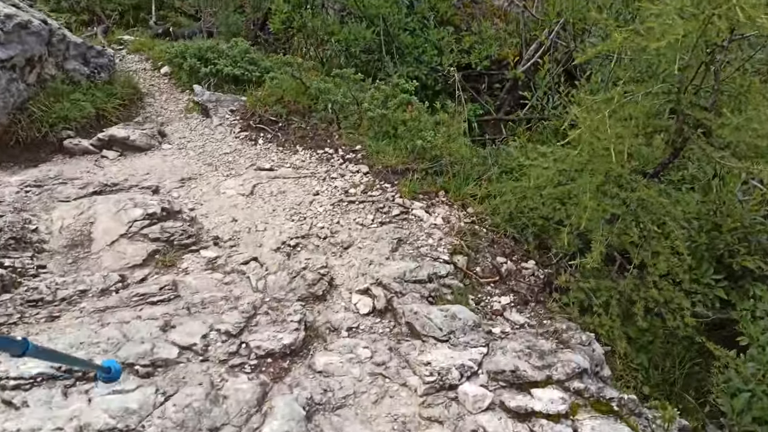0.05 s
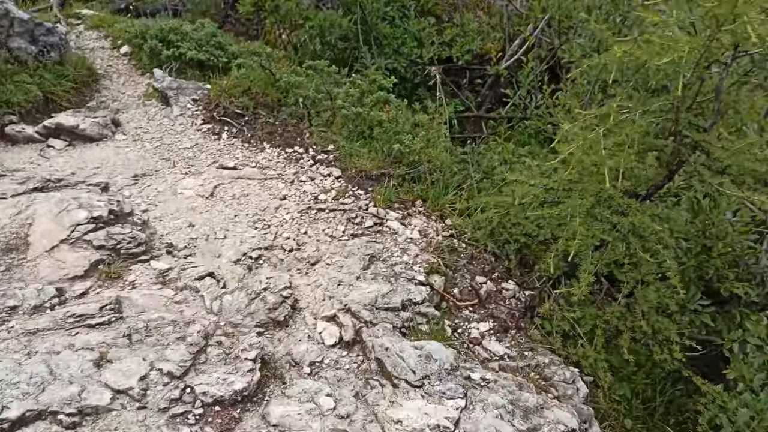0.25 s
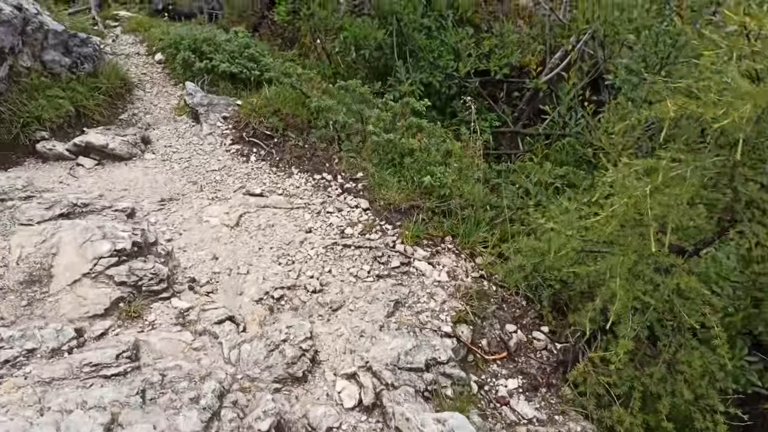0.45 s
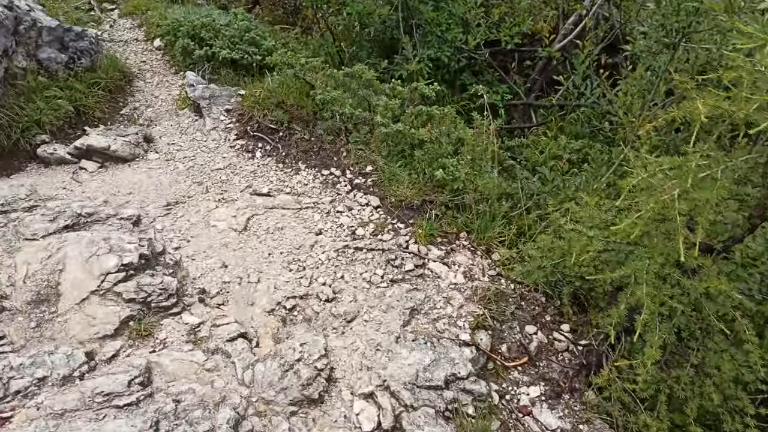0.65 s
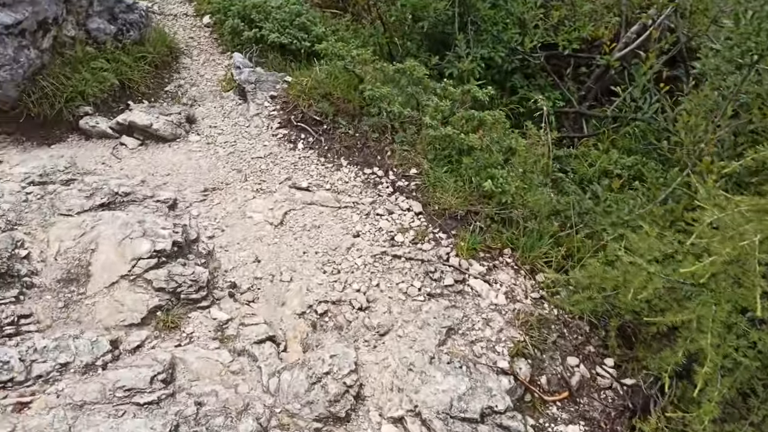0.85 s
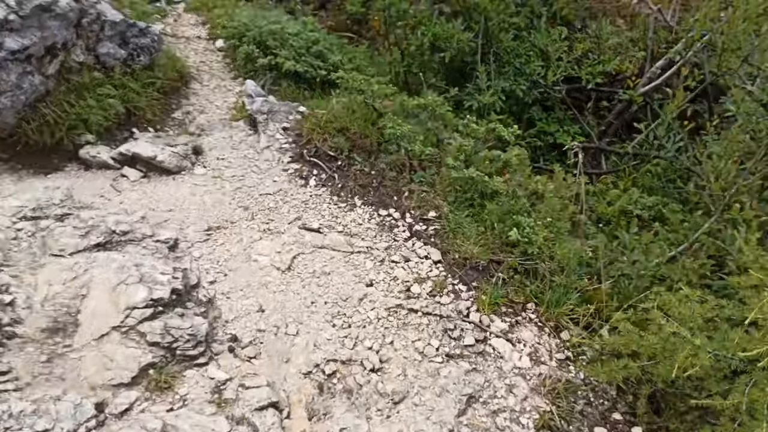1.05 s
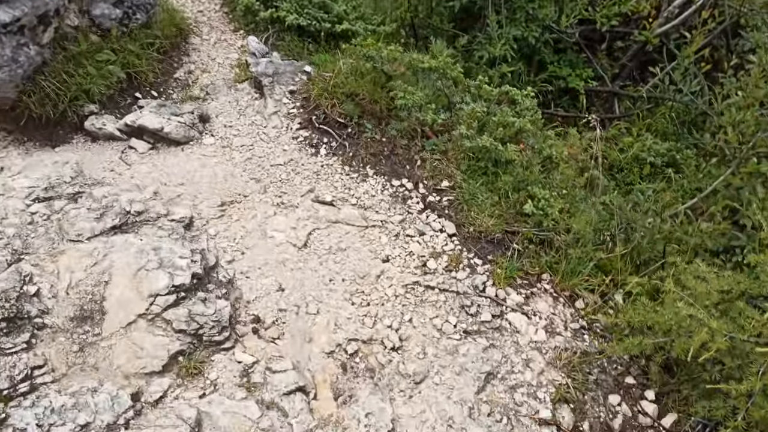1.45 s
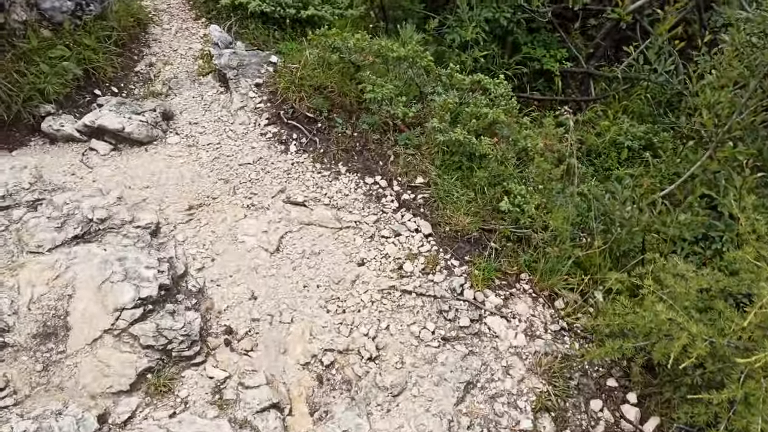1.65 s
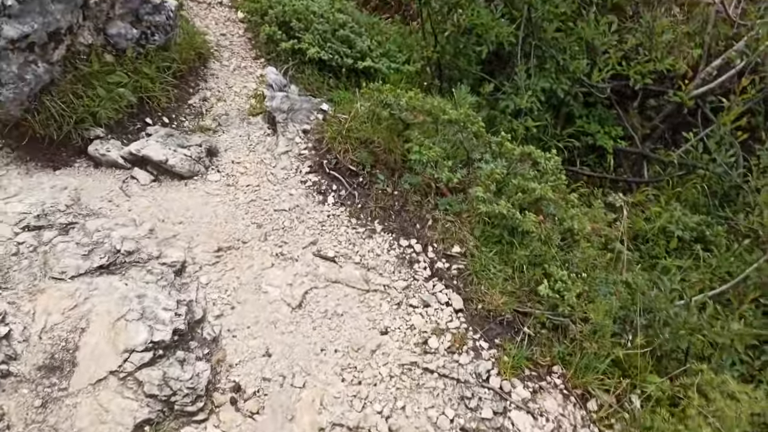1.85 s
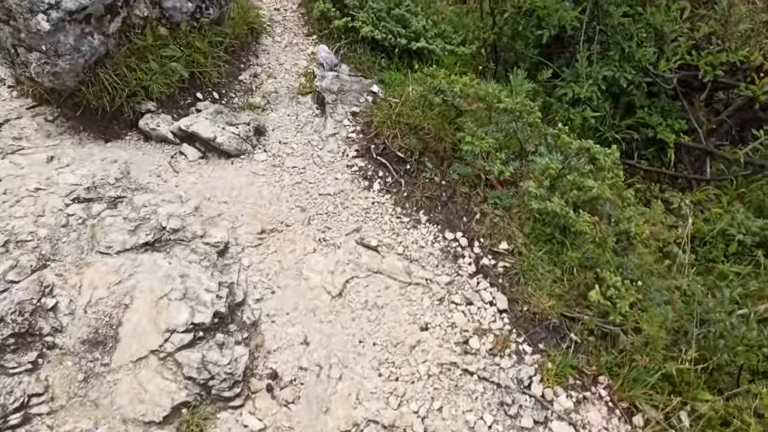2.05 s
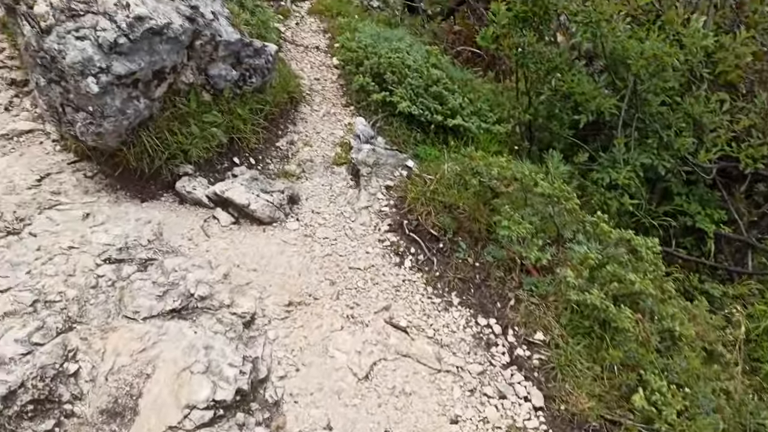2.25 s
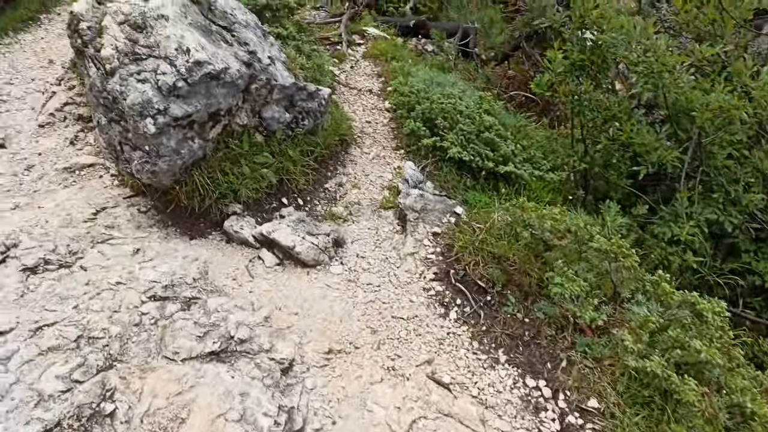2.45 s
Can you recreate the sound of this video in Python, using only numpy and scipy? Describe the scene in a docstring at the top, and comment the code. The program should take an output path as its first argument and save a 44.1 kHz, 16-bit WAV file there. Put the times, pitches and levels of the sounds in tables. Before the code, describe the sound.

A hiker's boots scuff gravel with dull thuds, close by, over faint outdoor hiss. Around 0.3 seconds a metal pole tip cracks twice on rock, chattering and ringing briefly. Uneven steps continue, with small stones ticking and grinding, most clearly near 1.1 seconds. A distant bird gives thin, faint whistles at 0.5 and 1.5 seconds. At about 2.3 seconds the pole strikes twice more, the second time softer.

```python
"""A hiker on a stony mountain trail, heard from a microphone carried at the body.
Over a faint outdoor hiss, boots scuff the gravel and land with dull thuds. A metal pole tip cracks on rock
twice, chattering and ringing the shaft. Small stones tick and grind under the soles as the walk goes on,
and a far bird whistles twice, a second apart. Near the end the pole strikes twice more."""
import sys
import numpy as np
from scipy import signal
from scipy.fft import rfft, irfft, next_fast_len
from scipy.io import wavfile
from scipy.ndimage import uniform_filter1d

SR = 44100
rng = np.random.default_rng(int(sys.argv[2]) if len(sys.argv) > 2 else 0)


def transcribe(signal):
    """Save signal, clipped to [-1, 1], as a 16-bit WAV file at the path in sys.argv[1]."""
    frames = np.atleast_2d(signal).T
    limited = np.clip(frames, -1, 1)
    pcm = np.round(limited * 32767).astype(np.int16)
    wavfile.write(sys.argv[1], SR, pcm)


N = 114660
T = np.arange(N) / SR
HIT_T = T[:8192]  # time axis of one short sound
TIP_LIKENESS, GRIT_LIKENESS = 0.53, 0.3  # left-right correlation: 0 is wide, 1 is mono


def undb(db):
    return 10 ** (np.asarray(db) / 20)


def unit(x):
    """Scale to rms 1."""
    return x / np.sqrt(np.mean(x ** 2))


def blow(x):
    """Scale a hit to the energy of 10 ms at rms 1."""
    return unit(x) * np.sqrt(.01 * SR / x.shape[-1])


def pan(db):
    """Left and right gains; positive dB leans left."""
    return unit(undb(np.array([[db], [-db]]) / 2))


def add(out, start_s, x):
    """Mix a short sound in."""
    i = int(start_s * SR)
    out[:, i:i + x.shape[-1]] += x[..., :N - i]


def colour(x, points):
    """Minimum-phase EQ through (Hz, dB) points."""
    size = 2 * next_fast_len(x.shape[-1])
    hz, db = np.array(points, float).T
    gain = undb(np.interp(np.log(np.fft.rfftfreq(size, 1 / SR) + 1), np.log(hz), db))
    cepstrum = irfft(np.log(gain))
    cepstrum[1:size // 2] *= 2
    cepstrum[size // 2 + 1:] = 0
    return irfft(rfft(x, size) * np.exp(rfft(cepstrum)))[..., :x.shape[-1]]


def band(x, hz, width_hz):
    """One resonance."""
    return signal.lfilter(*signal.iirpeak(hz, hz / width_hz, fs=SR), x)


def steep_band(x, hz, width_hz):
    """The same resonance twice, for steeper skirts."""
    return band(band(x, hz, width_hz), hz, width_hz)


def stereo(three, likeness):
    """Left and right from one shared and two separate signals."""
    return np.sqrt(likeness) * three[0] + np.sqrt(1 - likeness) * three[1:]


def swell(rise_s):
    """Rounded attack."""
    return np.sin(np.pi / 2 * np.minimum(HIT_T / rise_s, 1)) ** 2


def arch(length_s):
    """Round-shouldered envelope from silence to silence."""
    return np.sqrt(np.abs(np.sin(np.pi * np.minimum(HIT_T / length_s, 1))))


def burst(rise_s, fade_s, likeness=TIP_LIKENESS):
    """Dense micro-impacts that build up and die away."""
    noise = stereo(rng.standard_normal((3, len(HIT_T))), likeness)
    return noise * swell(rise_s) * np.exp(-np.maximum(HIT_T - rise_s, 0) / fade_s)


def air(level_db=-60.5, waver_db=.8, wide_above_hz=1514):
    """A soft, wavering outdoor bed, centred in the bass and wide in the treble."""
    # tone of the outdoor hiss: freq_hz, gain_db
    air_eq = [(25, -30), (55, -8.5), (95, -5.5), (250, -2.5), (450, -5.5), (900, -9), (1600, -17.5),
              (3600, -18), (5500, -22.5), (7000, -14), (8500, -21), (12500, -24.5), (16000, -31.5)]
    mid, side, drift = rng.standard_normal((3, N))
    side = signal.sosfilt(signal.butter(1, wide_above_hz, "high", fs=SR, output="sos"), side)
    for _ in range(2):
        drift = uniform_filter1d(drift, size=4000, mode="wrap")
    hiss = unit(colour(mid + 1.3 * np.array([side, -side]), air_eq))
    return undb(level_db + waver_db * unit(drift)) * hiss


def grains(eq, grains_per_s=2500, spread_db=4.5):
    """A stream of grit clicks of unequal size."""
    size = undb(spread_db * np.minimum(rng.exponential(size=(3, N)), 4.3))
    hits = rng.random((3, N)) < grains_per_s / SR
    clicks = hits * size * np.sign(rng.standard_normal((3, N)))
    return unit(colour(stereo(clicks, GRIT_LIKENESS), eq))


def scuffs(rise_s=.011, fade_s=.022):
    """Each drag of a sole swells, holds and fades: fine grit hisses, coarse gravel crunches."""
    # soles dragging over grit: start_s, length_s, hiss_db, crunch_db, pan_db
    drags = [(-.02, 0.076, -57, -59.5, -1.5), (0.219, 0.034, -45, -71, 2.5),
             (0.27, 0.063, -48.5, -58.5, -0.5), (0.375, .025, -51, -45.5, -2),
             (0.484, 0.099, -60, -64.5, -3.5), (.53, 0.13, -57, -67, -0.5), (0.724, .02, -60.5, -61.5, -4),
             (0.906, 0.082, -57, -68, 2.5), (1.003, 0.047, -57.5, -58.5, -1.5),
             (1.065, 0.071, -46, -48.5, -3.5), (1.15, 0.033, -51, -54, 0.5),
             (1.203, 0.086, -50.5, -52, -7.5), (1.335, 0.088, -58, -62, -32),
             (1.422, 0.068, -55.5, -53, -6), (1.532, 0.17, -62.5, -63.5, -7), (1.618, 0.11, -55, -58, -3.5),
             (1.742, 0.19, -64, -62.5, -2.5), (1.943, 0.074, -59, -59.5, -6),
             (2.053, 0.023, -57.5, -54.5, 1.5), (2.273, 0.099, -48.5, -49, -2.5),
             (2.38, 0.22, -64, -61, -4)]
    # tone of fine grit: freq_hz, gain_db
    grit_eq = [(300, -16), (1200, -5), (2400, -7.5), (3500, -3), (4500, -1.5), (5500, -13.5), (6700, 4),
               (7700, -1.5), (8500, -8), (12000, -13), (16000, -16)]
    # tone of coarse gravel: freq_hz, gain_db
    gravel_eq = [(40, -40), (110, 2), (260, 0), (500, -5), (800, -4), (1200, -14.5), (2200, -13),
                 (6000, -48.5)]
    hiss_power, crunch_power = 0, 0
    for start_s, length_s, hiss_db, crunch_db, pan_db in drags:
        attack = np.clip((T - start_s) / rise_s, 0, 1)
        release = np.exp(-np.maximum(T - start_s - length_s, 0) / fade_s)
        envelope = pan(pan_db) * attack * release
        hiss_power += (undb(hiss_db) * envelope) ** 2
        crunch_power += (undb(crunch_db) * envelope) ** 2
    return np.sqrt(hiss_power) * grains(grit_eq) + np.sqrt(crunch_power) * grains(gravel_eq)


def thuds(low_cut_hz=116, high_cut_hz=1110, settle_db=-6.5):
    """Boots and gear push once into a heavily damped low resonance, then settle a little."""
    # dull knocks of boots and gear: start_s, level_db, pitch_hz, pan_db
    knocks = [(0.2232, -30.5, 302, -0.5), (.248, -41, 255, 1), (0.3986, -29.5, 208, -1.5),
              (0.41, -53, 262, 18), (.426, -48, 240, 1), (0.93, -53.5, 350, -3), (0.9698, -30, 260, 1),
              (0.9768, -34.5, 314, 0), (1.120, -42, 635, -31), (1.127, -46.5, 290, -17),
              (1.143, -48, 500, 1), (1.2108, -45, 446, -29), (1.6335, -40, 252, -0.5),
              (1.648, -40, 300, -1), (1.676, -50.5, 274, 0), (1.695, -39.5, 302, -1.5),
              (1.7021, -37, 240, -0.5), (1.753, -48.5, 228, 0), (1.834, -54, 330, -1),
              (1.873, -58.5, 500, 0), (2.0664, -38, 162.4, 1), (2.1405, -49, 310, -3.5),
              (2.198, -56.5, 545, 7.5), (2.3597, -43, 314, 2)]
    cuts = np.vstack([signal.butter(3, low_cut_hz, "high", fs=SR, output="sos"),
                      signal.butter(2, high_cut_hz, fs=SR, output="sos")])
    push = HIT_T * np.exp(-HIT_T / .00043)
    out = np.zeros((2, N))
    for start_s, level_db, hz, pan_db in knocks:
        settle = burst(rise_s=.001, fade_s=.01, likeness=.9)
        body, tail = (blow(signal.sosfilt(cuts, band(x, hz, width_hz=hz))) for x in (push, settle))
        add(out, start_s, undb(level_db) * pan(pan_db) * (body + undb(settle_db) * tail))
    return out


def pole(tail_db=-6.5, tail_s=.013):
    """The tip cracks and chatters on rock, the shaft rings, nearby rock scatters a short tail."""
    # tip on rock: start_s, crack_db, rise_s, fade_s, ring_db, pan_db, one band_db per tip resonance
    strikes = [(0.2578, -17.5, 0.0017, 0.0053, -27, 0, -37, -28.5, -29.5, -32, -13.5),
               (0.3498, -24, 0.0028, .0021, -28.5, 4, -40, -36, -36, -26, -16),
               (2.2941, -21, 0.0019, 0.0034, -27, 3, -28.5, -37.5, -25, -21.5, -20.5),
               (2.3456, -43.5, 0.0027, 0.0045, -30.5, 4.5, -36, -43, -42, -35.5, -31)]
    # tone of the crack: freq_hz, gain_db
    crack_eq = [(60, -20.5), (400, -4.5), (700, -8.5), (1100, -1), (1600, -4), (2300, -8.5), (3500, -1),
                (4700, -0.5), (5300, -19.5), (6000, 6), (6700, 0.5), (7600, 4.5), (8400, -0.5), (12000, -8),
                (16000, -18.5)]
    # five broad resonances of the tip and ferrule: pitch_hz, width_hz
    tip_bands = [(1020, 202), (2220, 950), (2800, 600), (4560, 650), (6680, 1180)]
    # ringing modes of the shaft: pitch_hz, level_db, t60_s
    shaft_modes = [(283, -2, .125), (992, -3, .07), (7604, -3, .1), (520, -13, .05), (870, -16, .06),
                   (2050, -15, .06), (2740, -9, .06), (2960, -12, .06), (4530, -7, .06), (4740, -6, .06),
                   (5770, -13, .06), (6535, -2, .07), (6700, -7, .08), (7340, -8, .1), (7970, -13, .08)]
    out = np.zeros((2, N))
    for start_s, crack_db, rise_s, fade_s, ring_db, pan_db, *bands_db in strikes:
        crack = blow(colour(burst(rise_s, fade_s), crack_eq))
        tail = blow(colour(burst(rise_s, tail_s), crack_eq))
        chatter, ring = 0, 0
        for (hz, width_hz), band_db in zip(tip_bands, bands_db):
            chatter += undb(band_db) * blow(steep_band(burst(rise_s, fade_s), hz, width_hz))
        for hz, mode_db, t60_s in shaft_modes:
            spread = min(hz / 5000, 1)  # higher modes sound wider
            phase = rng.uniform(0, 2 * np.pi) + spread * rng.standard_normal((2, 1))
            ring += undb(mode_db - 60 * HIT_T / t60_s) * np.sin(2 * np.pi * hz * HIT_T + phase)
        tip = undb(crack_db) * (crack + undb(tail_db) * tail) + chatter
        shaft = undb(ring_db) * ring * swell(rise_s)
        add(out, start_s, pan(pan_db) * tip + pan(pan_db / 2) * shaft)
    return out


def from_left(x, lag_s=.0004, lag_top_hz=6760):
    """A source on the left reaches the right channel later; only the lows and mids are delayed."""
    hz = np.minimum(np.fft.rfftfreq(N, 1 / SR), lag_top_hz)
    right = irfft(rfft(x[1]) * np.exp(-2j * np.pi * hz * lag_s), N)
    return np.array([x[0], right])


def ticks():
    """Tiny hard contacts, each with one broad resonance."""
    # light taps of the tip and of loose stones: start_s, level_db, pitch_hz, width_hz, pan_db
    taps = [(.273, -32, 7600, 1100, -7), (.2878, -37.5, 7500, 1300, -5), (.2995, -43.5, 7500, 1200, 9),
            (.3165, -44.5, 3940, 5500, -8), (0.365, -63, 6800, 2550, 7), (.5605, -47.5, 7500, 1540, -8),
            (.9688, -45.5, 844, 700, -6), (1.0152, -44, 2000, 2610, 0.5), (1.0155, -49, 6850, 2000, 8),
            (1.1195, -42, 3900, 4170, -34), (1.1198, -38, 1150, 1330, -29),
            (1.128, -56.5, 13200, 4000, -18), (1.4812, -42.5, 4000, 2330, 2), (1.482, -40, 6900, 2000, -1),
            (1.483, -48.5, 840, 128, -4), (1.6935, -49.5, 910, 800, -3), (1.7496, -59, 3200, 5000, 12),
            (1.7845, -61.5, 1300, 1760, 6.5), (2.1783, -61, 950, 1290, 5), (2.2222, -52, 633, 800, -5),
            (2.305, -35, 7740, 1000, -1), (2.310, -39, 6750, 3000, -3), (2.362, -43.5, 4440, 4000, -4)]
    out = np.zeros((2, N))
    for start_s, level_db, hz, width_hz, pan_db in taps:
        tick = steep_band(burst(rise_s=.0007, fade_s=.0011), hz, width_hz)
        add(out, start_s, undb(level_db) * pan(pan_db) * blow(tick))
    return out


def grinds(slips_per_s=240, width_hz=146):
    """Uneven stick-slip pulses ring a stone that turns under the sole."""
    # stones grinding underfoot: start_s, length_s, level_db, pitch_hz
    stones = [(0.458, 0.065, -65.5, 860), (1.065, 0.13, -53, 754), (1.431, 0.098, -59.5, 1080),
              (1.541, .03, -60.5, 1120), (1.809, 0.022, -57.5, 784)]
    out = np.zeros((2, N))
    for start_s, length_s, level_db, hz in stones:
        slips = rng.random((3, len(HIT_T))) < slips_per_s / SR
        pulses = stereo(slips * rng.standard_normal(slips.shape), GRIT_LIKENESS)
        stone = unit(steep_band(pulses, hz, width_hz))
        add(out, start_s, undb(level_db) * stone * arch(length_s))
    return out


def bird(fade_s=.05):
    """A far bird's thin whistles dip in pitch and rise again."""
    # whistled calls: start_s, length_s, level_db, first_hz, middle_hz, last_hz
    calls = [(0.541, 0.0725, -55, 2635, 2410, 2660), (1.505, 0.096, -64, 2980, 2830, 3030)]
    out = np.zeros((2, N))
    for start_s, length_s, level_db, *pitches_hz in calls:
        progress = np.minimum(HIT_T / length_s, 1)
        glide_hz = np.polyval(np.polyfit([0, .5, 1], pitches_hz, 2), progress)
        whistle = np.sin(2 * np.pi * np.cumsum(glide_hz) / SR)
        envelope = 2 * arch(length_s) * np.exp(-HIT_T / fade_s)
        add(out, start_s, undb(level_db) * envelope * whistle)
    return out


def scene():
    """The pole on the left, footwork close by, bird and air behind."""
    return from_left(pole()) + ticks() + thuds() + scuffs() + grinds() + bird() + air()


def record(dry, top_hz=15900):
    """The recorder carves a deep gap in the treble and cuts the top steeply."""
    # recorder tone, scooped around 10 kHz: freq_hz, gain_db
    recorder_eq = [(20, -0.5), (8300, -1.5), (8800, -19.5), (9600, -30), (11250, -29), (11650, -3.5),
                   (16000, 4.5)]
    top_cut = signal.ellip(12, .2, 95, top_hz, fs=SR, output="sos")
    return signal.sosfilt(top_cut, colour(dry, recorder_eq))


dry = scene()
out = record(dry)
transcribe(out)
```